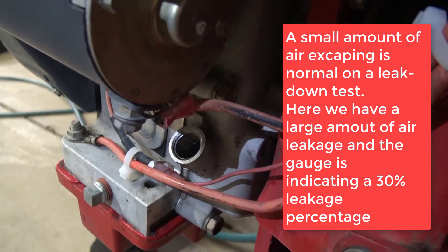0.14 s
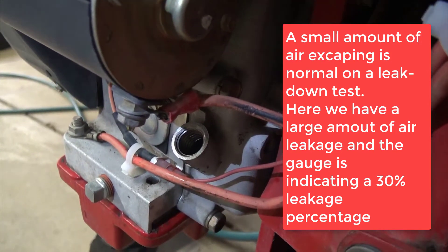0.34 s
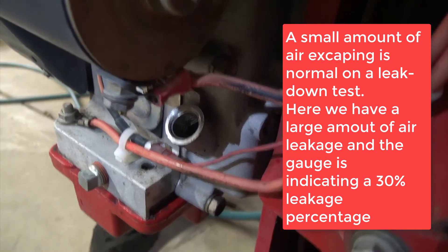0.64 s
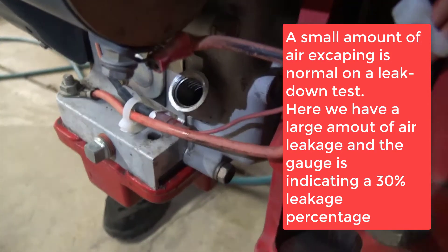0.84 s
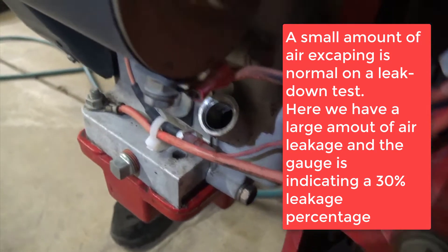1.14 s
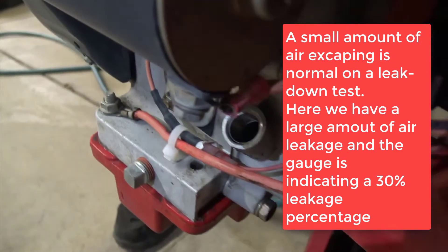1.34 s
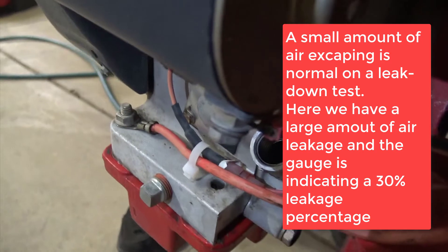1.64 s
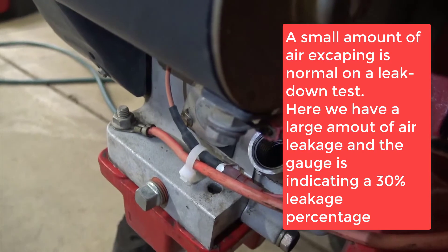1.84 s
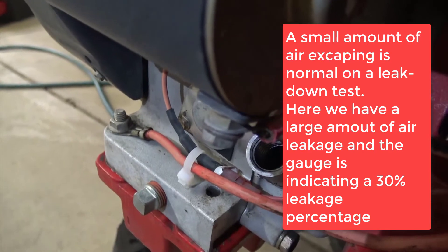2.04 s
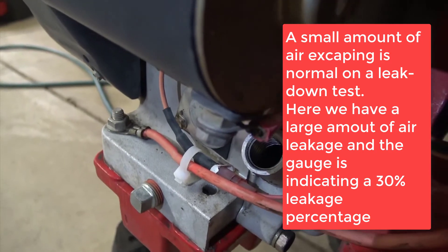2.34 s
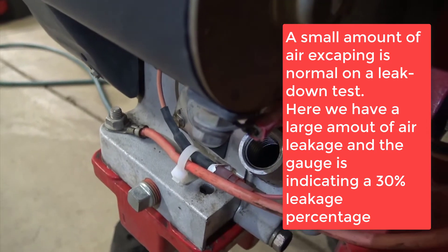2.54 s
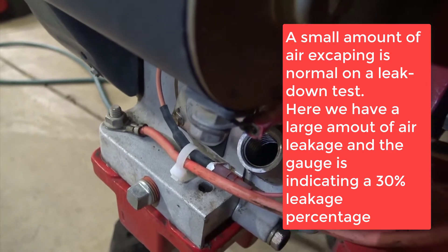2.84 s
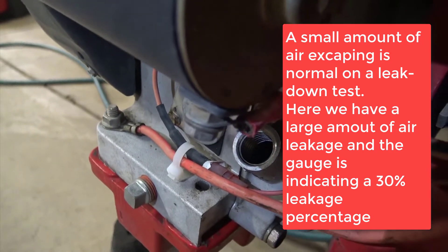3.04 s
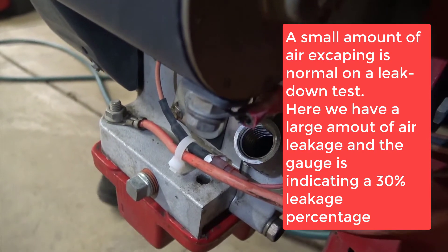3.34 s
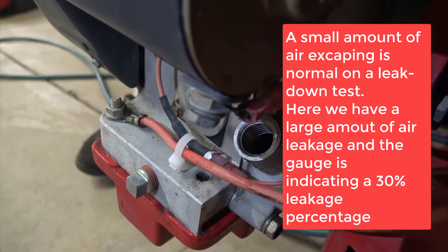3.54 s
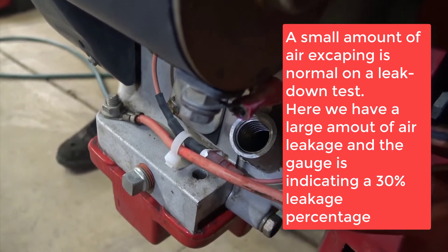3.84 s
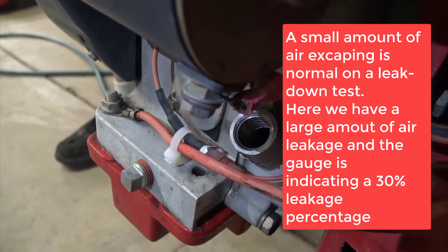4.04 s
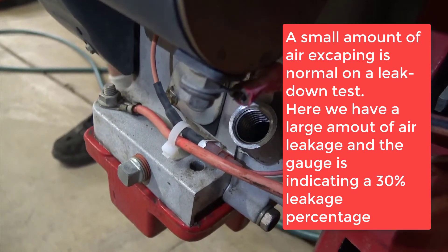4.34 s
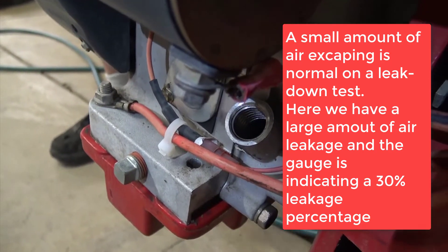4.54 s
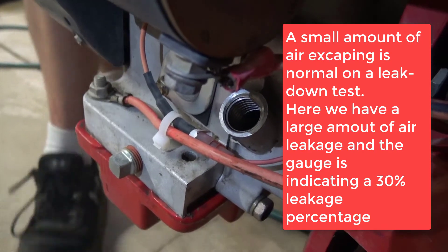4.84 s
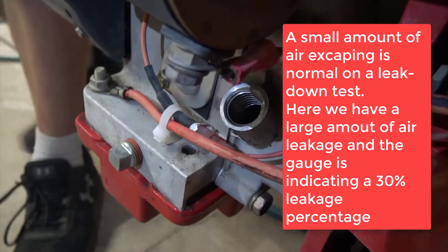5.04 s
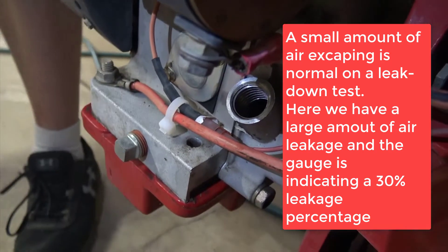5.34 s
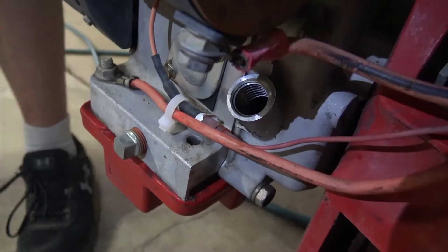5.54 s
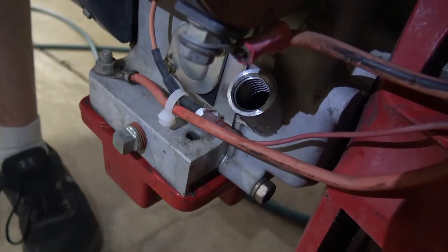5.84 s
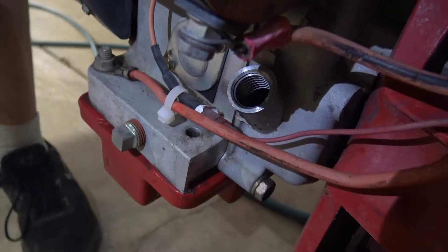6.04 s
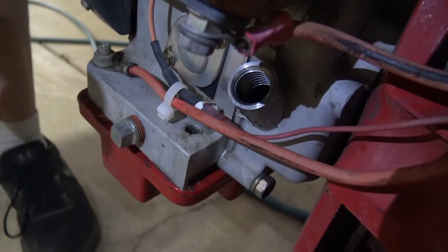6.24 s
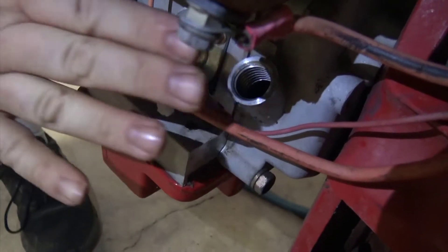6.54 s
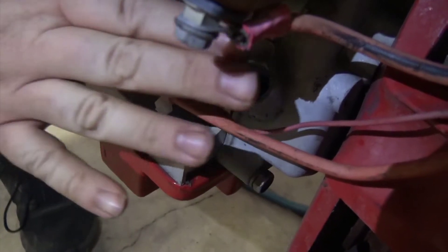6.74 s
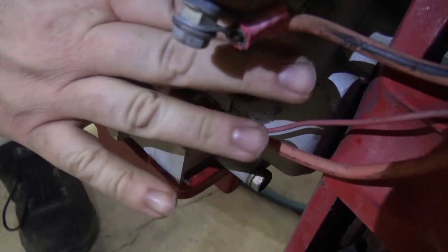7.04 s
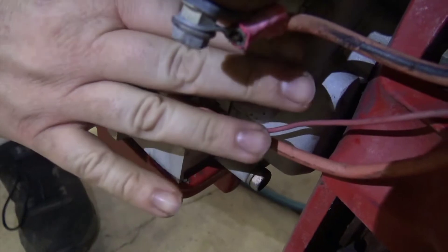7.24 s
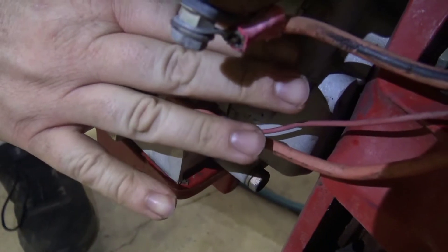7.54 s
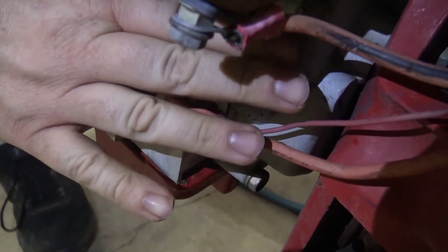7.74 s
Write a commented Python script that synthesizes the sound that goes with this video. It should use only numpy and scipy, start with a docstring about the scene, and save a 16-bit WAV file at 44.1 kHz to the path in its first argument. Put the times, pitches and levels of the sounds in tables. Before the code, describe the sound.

Steady, sharp compressed-air hiss, recorded close with a moving phone in a quiet garage. Rapid puffs and a spit come near one second, then the leak fades under hard, dry metallic knocks and a loose tool's rattle. More clunks come around three seconds. The hiss gradually rebuilds to its loudest, one gritty shoe scuff passes, and covering the opening narrows the hiss.

```python
"""A loose hose coupling spits air over the hiss of compressed air leaking through an engine crankcase in a garage.
Tools knock, rattle and scrape on the frame: short forces make its resonances ring. Dull thumps and brief hoots,
made from sine tones, join in. The phone swings round to face the open filler neck, a shoe scuffs, and a hand
covers the neck at the end. The hiss is noise shaped by drifting resonances; soft room noise lies underneath."""
import sys
import numpy as np
from scipy import signal
from scipy.fft import rfft, irfft
from scipy.io import wavfile
from scipy.ndimage import uniform_filter1d, map_coordinates

SR = 44100
rng = np.random.default_rng(int(sys.argv[2]) if len(sys.argv) > 2 else 0)


def wav_record(signal):
    """Record a signal, one row per channel, as 16-bit PCM in the file named by sys.argv[1]."""
    frames = np.transpose(np.atleast_2d(signal))
    bounded = np.clip(frames, -1, 1)
    # unit amplitude maps onto the largest positive 16-bit level
    quanta = np.round(bounded * 32767).astype(np.int16)
    wavfile.write(sys.argv[1], SR, quanta)


N = 347938


def undb(db):
    """Turn decibels into gain."""
    return 10 ** (np.asarray(db) / 20)


def over_time(t, table, column=1):
    """Read one column of a table at the times t, with straight lines between the rows."""
    columns = np.transpose(table)
    return np.interp(t, columns[0], columns[column])


def along(table, hz):
    """Read (f/Hz, level/dB) points on a log-frequency axis."""
    f, db = np.transpose(table)
    return np.interp(np.log(hz + 1), np.log(f), db)


def ring(modes, hz, steep):
    """Add up the power of a set of resonances; each is a peak that falls away on both sides."""
    return sum(undb(2 * db) / (1 + (2 * (hz - f) / width) ** 2) ** steep for f, width, db in modes)


def shaped(x, gain):
    """Filter a sound with one gain per frequency bin."""
    return irfft(rfft(x) * gain, len(x))


def patches(shape, bins, frames):
    """Make a random field that wanders smoothly over frequency and time, with spread 1."""
    field = rng.standard_normal(shape)
    for _ in range(2):
        field = uniform_filter1d(field, size=bins, axis=0)
        field = uniform_filter1d(field, size=frames, axis=1)
    return field / field.std()


def fading(t, t60, hold=0):
    """Hold at full level, then fall by 60 dB in every t60 seconds."""
    return 1000. ** (-np.maximum(t - hold, 0) / t60)


def add(out, s, sound):
    """Mix a sound in at time s."""
    i = int(s * SR)
    out[i:i + len(sound)] += sound[:N - i]


def struck(modes, force, lo_hz, hi_hz):
    """A force makes a set of modes ring; those between the two frequencies answer most."""
    hz = np.fft.rfftfreq(len(force), 1 / SR) + 1
    body = 0
    for k, (f, width, db) in enumerate(modes):
        sign = (-1) ** k
        body = body + sign * undb(db) / (1 + 1j * (hz / f - f / hz) * f / width)
    for ratio in (hz / hi_hz, -lo_hz / hz):  # soften the highs, then the lows
        body = body / (1 + 1.4j * ratio - ratio ** 2) ** 3
    return shaped(force, body / np.sqrt(np.mean(abs(body) ** 2)))


def side_share(pan_db):
    """Side over mid for a source that is this many dB louder on the left."""
    return (undb(pan_db) - 1) / (undb(pan_db) + 1)


# resonances of the hiss as heard from four places: (f/Hz, width/Hz, level/dB)
COUPLING = [(1120, 56, -9), (1578, 120, 7.5), (1900, 360, 3), (2256, 124, 3), (3340, 230, -10.5),
            (3965, 310, -0.5), (6310, 230, -1.5), (6940, 24, 0.5), (7520, 430, 0), (9200, 3000, -7.5),
            (10330, 320, -1.5), (11430, 590, -4.5), (12930, 99, -2), (15200, 320, -13.5)]
ASIDE = [(1177, 110, -20.5), (2175, 120, -14.5), (3256, 34, -4.5), (3682, 14, -2), (4143, 29, -6.5),
         (6240, 30, -9), (6700, 33, -1), (7160, 50, -14), (5340, 180, -12.5), (7500, 80, -14),
         (8760, 310, -4.5), (9210, 83, 8.5), (9544, 196, 4.5), (10500, 180, -19), (10300, 29, -10),
         (11340, 89, -2.5), (12200, 66, -15.5), (12630, 690, -4.5), (13600, 110, 0), (14550, 67, -0.5)]
FACING = [(1057, 72, -20), (1235, 31.4, -8.5), (1444, 63, -19), (2110, 22.3, -5.5), (2244, 94, -15.5),
          (3082, 24, -3.5), (3287, 49, -8), (3420, 70, -16.5), (4534, 23, 1.5), (4860, 30, -10),
          (5200, 54, -11.5), (5740, 49, -4), (5927, 71, 0), (6190, 180, -3.5), (6240, 62, -13.5),
          (6420, 49, 3), (7096, 130, -5), (6650, 62, -1.5), (7420, 88, -9), (7910, 120, -8),
          (8670, 240, -9.5), (9480, 210, -16), (9830, 280, 0), (10033, 245, 3.5), (10560, 85, -13.5),
          (11040, 280, -7), (12860, 240, -9.5), (13180, 370, -11), (14000, 150, -12.5)]
COVERED = [(1087, 41, -23), (1235, 48, -21.5), (2140, 32, -12), (2350, 360, -26), (3090, 22, -12),
           (3270, 13, -7.5), (3750, 80, -13.5), (4526, 28, 4.5), (4846, 77, -8), (4930, 60, -10),
           (5190, 70, -8.5), (6040, 120, -7.5), (6280, 69, -6.5), (6540, 130, 1), (7180, 128, -5),
           (7590, 250, -7.5), (8000, 260, -9), (9140, 270, -8.5), (9880, 270, -7), (9930, 110, -2.5),
           (12860, 310, -13), (14200, 240, -23)]
# which place is heard, 0-3 in the order above; fractions blend two: (t/s, place)
PLACE = [(0, 0), (.55, 0.3), (1.0, 0.5), (1.3, 1.5), (2.5, 1.36), (4.0, 1), (5.6, 2), (6.65, 2),
         (7.15, 2.5), (7.9, 3)]
# turbulence between the resonances, lowered by 12.5 dB below: (f/Hz, level/dB)
BED = [(290, -73.5), (500, -79), (1260, -23), (1470, -15), (1680, -88.5), (2170, -19), (2810, -25),
       (2980, -18), (3300, -9), (5220, -16.5), (6390, -2), (8650, -9.5), (11700, -1.5), (13100, -7),
       (15600, -9.5)]
# how far the resonances drift at each place: (share of their frequency, one per place)
WANDER = [0.017, .004, 0.00078, 0.0023]
# borders of the four bands cavity, neck, whistle and jet: (f/Hz)
EDGES_HZ = [0, 2700, 5450, 8400, 22050]
# how wide the hiss is: (f/Hz, side minus mid level/dB)
WIDE = [(500, -40), (2000, -88), (4000, -45), (5500, -21), (10200, -16.5), (10700, -18.5), (15500, -71)]
WINDOW, OVERLAP = 1024, 768  # samples in each short slice of sound, and shared by neighbours
TREBLE_HZ = 11000


def hiss():
    """Leaking air is turbulent noise that excites the cavity resonances; returns mid and side."""
    hz, t, mid = signal.stft(rng.standard_normal(N), SR, nperseg=WINDOW, noverlap=OVERLAP)
    side = signal.stft(rng.standard_normal(N), SR, nperseg=WINDOW, noverlap=OVERLAP)[2]
    bed = undb(2 * (along(BED, hz) - 12.5))
    colours = np.array([ring(modes, hz, 1.56) + bed for modes in (COUPLING, ASIDE, FACING, COVERED)])
    colours = colours / (1 + (500 / (hz + 1)) ** 4)  # a small opening radiates no bass

    # blend the places in dB, then let the resonances drift in frequency
    place = over_time(t, PLACE)
    share = np.clip(1 - abs(place - np.arange(len(colours))[:, None]), 0, 1)
    power = undb(2 * (10 * np.log10(colours.T) @ share))
    drift = 1 + (WANDER @ share) * patches(mid.shape, 90, 70)
    row, column = np.indices(mid.shape)
    power = map_coordinates(power, [row * drift, column], order=1, mode="nearest")

    # each resonance swells slowly and the flow flutters
    swelling_db = 1.8 * patches(mid.shape, 3, 35)
    flutter_db = 1.04 * patches(mid.shape, 90, 3)
    power = power * dips(hz, t) ** 2 * undb(2 * (swelling_db + flutter_db))

    # even out slow changes in each band, then give it its own level over time
    gain = np.zeros(mid.shape)
    for lo, hi, level in zip(EDGES_HZ, EDGES_HZ[1:], band_levels(t, share)):
        band = (hz >= lo) & (hz < hi)
        total = uniform_filter1d(power[band].sum(axis=0), size=40) / len(hz)
        gain[band] = np.sqrt(power[band] / total) * level
    gain[hz > TREBLE_HZ] *= treble(t)
    side_gain = gain * undb(along(WIDE, hz))[:, None]
    return [signal.istft(z, SR, nperseg=WINDOW, noverlap=OVERLAP)[1][:N]
            for z in (mid * gain, side * side_gain)]


# overall level of the leak as heard, sinking around some loud knocks and recovering;
# it is then shared out over the bands: (t/s, level/dB)
FLOW = [(0, -30), (.46, -33.5), (.6, -31.5), (1.05, -37.5), (1.3, -38.5), (1.55, -44), (1.72, -52),
        (1.8, -43), (1.96, -45.5), (2.1, -40.5), (2.26, -42.5), (2.45, -37), (2.97, -36.5), (3.07, -43),
        (3.9, -37.5), (4.5, -32.5), (5.1, -29.5), (5.48, -28.5), (5.7, -27.5), (6.7, -26.5), (7.2, -29.5),
        (7.89, -29.5)]
# how the leak is shared out, one row per place: (cavity level/dB, neck level/dB, whistle level/dB, jet level/dB)
BALANCES = [(-16, -24.5, -8, -0.5), (-21, -15, -3.5, -0.5), (-21, -14, -4, -2), (-16, -6.5, -0.5, -5.5)]
# the hiss dulls and brightens as the phone wanders; changes on top of the other levels:
# (t/s, cavity level/dB, neck level/dB, level/dB above TREBLE_HZ)
TINT = [(0, -3, -1, 0.5), (1.0, 7.5, 0, -0.5), (1.3, 1, -8.5, 0), (1.75, -2, -0.5, 0.5),
        (2.05, -3.5, 1, 3.5), (2.35, -7, 1, 0.5), (2.8, 5, 2, -1.5), (3.3, 1.5, 0.5, 4),
        (4.0, -2.5, 0, 1.5), (5.0, -1, -1, -3), (6.2, -1.5, -0.5, -1.5), (7.0, -1.5, 2, -3.5),
        (7.89, -0.5, 0.5, 4)]
# puffs from the loose coupling, and last a slow, faint, whistling swell of the hiss;
# the last three columns are relative to the jet level:
# (t/s of the top, jet level/dB, rise/s, fall/s, whistle level/dB, neck level/dB, cavity level/dB)
PUFFS = [(.65, -32, 0.027, 0.079, -10.5, -31, -9), (0.73, -29, 0.046, 0.064, -4.5, -15, -12.5),
         (.8, -32.5, 0.05, 0.1, -4.5, -6, -5), (0.945, -25, 0.041, 0.048, -20, -17, -11.5),
         (1.04, -33.5, 0.013, 0.011, -10, -31, -24), (1.125, -31, 0.025, 0.02, 1, -22, -10.5),
         (1.157, -31.5, .018, 0.0084, -4, -25, -13), (1.63, -37.5, 0.039, 0.027, -25.5, -11, -7.5),
         (2.8, -51, 0.23, .12, 8.5, -11, -19)]


def band_levels(t, share):
    """The overall level of the leak, shared out for the present place, plus puffs and a swell, sets each band."""
    tint = np.array([over_time(t, TINT, 1), over_time(t, TINT, 2), 0 * t, 0 * t])
    power = undb(2 * (over_time(t, FLOW) + np.transpose(BALANCES) @ share + tint))
    for s, db, rise, fall, whistle_db, neck_db, cavity_db in PUFFS:
        swell = np.exp(-((t - s) / np.where(t < s, rise, fall)) ** 2)
        bands_db = db + np.array([[cavity_db], [neck_db], [whistle_db], [0]])
        power = power + undb(2 * bands_db) * swell ** 2
    return np.sqrt(power)


def treble(t):
    """Gain of the highest part of the hiss as the phone wanders."""
    return undb(over_time(t, TINT, 3))


# narrow bands where the hiss is thinner, some fixed and some gliding:
# (start t/s, end t/s, start f/Hz, end f/Hz, depth/dB)
DIPS = [(-0.1, 1.1, 6000, 4800, 13), (-.3, 1.1, 13800, 13700, 10), (1.4, 3.1, 10550, 10600, 9),
        (1.9, 4.8, 8610, 7700, 16.5), (1.9, 2.4, 12900, 14000, 18), (1.7, 4.2, 11950, 11800, 7),
        (3.5, 7.8, 2730, 2840, 15), (3.5, 6.8, 2440, 2470, 9), (1.7, 8.4, 1660, 1500, 3.5),
        (2.5, 4.6, 10600, 10300, 23.5), (4.0, 4.73, 9660, 9800, 15), (4.5, 6.1, 4700, 4380, 3.5),
        (7.5, 8.4, 4540, 4550, 9.5), (4.5, 8.4, 9920, 9880, 18), (6, 7.25, 14900, 14000, 15),
        (7, 14, 15300, 15300, 22), (5.5, 6.7, 11530, 11160, 13.5), (5.5, 7.37, 5100, 5700, 6),
        (1.0, 2.2, 5300, 5350, 10.5), (3.0, 4.9, 5250, 5250, 13), (7, 9.2, 11750, 12200, 19.5),
        (7.101, 8.4, 10960, 11300, 15), (6, 8.2, 8730, 9050, 11)]
DIP_WIDTH_HZ, DIP_FADE_S = 410, 0.78  # greatest width; length of each fade


def dips(hz, t):
    """Narrow bands where the hiss is thinner, some fixed and some gliding; each fades in and out."""
    gain = 1
    for start, end, from_hz, to_hz, depth_db in DIPS:
        centre = np.interp(t, [start, end], [from_hz, to_hz])
        width = min(DIP_WIDTH_HZ, 0.042 * to_hz)
        near = 1 / (1 + (2 * (hz[:, None] - centre) / width) ** 2)
        fade = np.clip(.5 + np.minimum(t - start, end - t) / DIP_FADE_S, 0, 1)
        gain = gain * undb(-near * fade * depth_db)
    return gain


def fine_ripple(depth_db):
    """The crankcase also has many weak, close modes: a fixed fine ripple over frequency."""
    field = rng.standard_normal(N // 2 + 1)
    for _ in range(2):
        field = uniform_filter1d(field, size=150)
    return undb(depth_db * field / field.std())


# one sharp spit of air: (t/s, level/dB, length/s)
SPITS = [(1.194, -23.5, 0.002)]


def spit():
    """A short burst of bright jet noise, coloured by the coupling, starts fast and dies away."""
    out, t = np.zeros(N), np.arange(SR // 20) / SR
    hz = np.fft.rfftfreq(len(t), 1 / SR)
    colour = np.sqrt(ring(COUPLING, hz, 1.1))
    colour = colour / (1 + (6500 / (hz + 1)) ** 3) / (1 + (hz / 11500) ** 12)  # keep the bright middle
    for s, db, length in SPITS:
        jet = shaped(rng.standard_normal(len(t)), colour)
        envelope = np.minimum(t / 0.00074, 1) * fading(t, 0.021, length)
        add(out, s, undb(db) * jet / jet.std() * envelope)
    return out


# what the frame rings with: (f/Hz, width/Hz, level/dB)
FRAME = [(156, 117, 3), (256, 29, 5.5), (346, 59, 0.5), (514, 37, 0.5), (636.5, 31, 2), (808, 51, -1),
         (946, 45, 1.5), (1072, 45, 4.5), (1144, 45, 4.5), (1307, 69, 5), (1580, 175, 0), (1806, 36, 5),
         (2100, 250, -1.5), (3100, 340, 0), (4130, 225, 7), (4300, 300, -6.5), (5100, 460, -7.5)]
# knocks; the tail level is relative to the peak of the blow: (t/s, peak level/dB, lowest f/Hz, highest f/Hz,
# t60/s of the chatter, contact/s, tail level/dB, left minus right level/dB)
KNOCKS = [(0.914, -24.5, 804, 2730, 0.047, 0.016, -26, -6),
          (1.112, -33.5, 730, 1490, 0.036, 0.0053, -16, 0),
          (1.123, -31.5, 200, 4400, 0.023, 0.002, -30, -4), (1.248, -44.5, 700, 1400, .045, 0.0056, -25, 0),
          (1.358, -36, 543, 1870, 0.059, 0.0057, -6, -3),
          (1.4195, -18.5, 165, 1660, 0.094, 0.002, -19.5, -4),
          (1.5419, -16.5, 189, 1620, 0.053, 0.002, -25, -2),
          (1.944, -37.5, 448, 1310, 0.071, 0.0068, -23, 2), (1.995, -47, 900, 1460, .05, .006, -22, 4),
          (2.255, -34, 950, 1450, 0.082, 0.0044, -12.5, -9), (2.271, -34, 480, 1420, 0.097, 0.01, -35, -1),
          (2.298, -29, 600, 1340, 0.081, 0.0025, -36, -3), (2.454, -35.5, 830, 1090, 0.095, 0.01, -14, -3),
          (2.508, -51, 650, 1200, 0.04, 0.0035, -20, -1),
          (2.688, -23.5, 283, 2330, 0.049, 0.0074, -12.5, 1),
          (2.69, -23.5, 2870, 4470, 0.062, 0.0092, -18, -2), (3.037, -29, 3830, 4500, .04, 0.0053, -18, 0),
          (2.823, -35.5, 230, 1390, 0.12, 0.0086, -18, -6),
          (2.938, -15.5, 272, 1800, 0.045, 0.0065, -18.5, 0), (2.9452, -14, 230, 1500, 0.05, 0.002, -25, 0),
          (3.036, -15, 387, 2000, 0.075, 0.006, -13, 0), (3.049, -18.5, 395, 1930, 0.16, 0.004, -16.5, -4),
          (4.239, -29, 252, 1810, 0.11, 0.012, -31, 2), (4.823, -48, 99, 490, 0.032, 0.0033, -20, 3),
          (6.484, -54, 156, 400, 0.042, 0.0024, -19, 1)]
CLICKS_PER_S, CHATTER_DB = 450, 3.5  # average rate of re-contacts; unevenness of the chatter
STRIKE_SPREAD_DB = 2.5  # each blow lands elsewhere, so the modes answer unevenly


def knocks():
    """A sharp blow and a short uneven chatter ring the frame, then a tail from the walls; mid and side."""
    out, t = np.zeros((2, N)), np.arange(2 ** 14) / SR
    for s, db, lo, hi, t60, contact, tail_db, pan_db in KNOCKS:
        chatter, walls, bounce = rng.standard_normal((3, len(t)))
        bounce = np.repeat(bounce[:len(t) // 128], 128)  # the strength jumps in short steps
        clicks = (rng.random(len(t)) < CLICKS_PER_S / SR) * np.sqrt(SR / CLICKS_PER_S)  # separate re-contacts
        force = chatter * (clicks + undb(-1.0)) * undb(CHATTER_DB * bounce) * fading(t, t60, contact)
        force[0] = undb(32.0)  # the first blow
        uneven = np.outer(rng.standard_normal(len(FRAME)), [0, 0, STRIKE_SPREAD_DB])
        hit = struck(np.array(FRAME) + uneven, force, lo, hi)
        tail = struck(FRAME, walls * np.minimum(t / 0.01, 1) * fading(t, 0.28), lo, hi)
        sound = undb(db) * (hit / abs(hit).max() + undb(tail_db) * tail)
        add(out[0], s, sound)
        add(out[1], s, uniform_filter1d(sound, size=48) * side_share(pan_db))  # mostly the lows lean
    return out


# a loose tool's modes: (f/Hz, width/Hz, level/dB)
TOOL = [(552, 41, 3.5), (1067, 26, 0.5), (1280, 68, -1), (1816, 47, 2.5), (2140, 68, -9), (3020, 165, -3),
        (3200, 170, -3.5), (4280, 45, -8.5), (4620, 97, -9.5)]
# its bounces, before the levels of burst and buzz: (t/s, level/dB)
BOUNCES = [(1.589, -27.5), (1.618, -25), (1.638, -26.5), (1.664, -27.5)]


def rattle():
    """A loose tool bounces: each time a click and a bright quick burst over a duller, longer buzz."""
    out, t = np.zeros(N), np.arange(2 ** 13) / SR
    for s, db in BOUNCES:
        burst, buzz = rng.standard_normal((2, len(t)))
        burst[0] = buzz[0] = undb(17.0)  # the click
        bright = struck(TOOL, burst * fading(t, 0.015, .004), 2600, 5200)
        dull = struck(TOOL, buzz * fading(t, 0.1, .016), 450, 2400)
        add(out, s, undb(db) * (undb(-9.5) * bright + undb(-7.0) * dull))
    return out


# scrapes on the frame: (t/s, length/s, level/dB, lowest f/Hz, highest f/Hz, roughness/dB, rise/s)
SCRAPES = [(0.58, 0.28, -57.5, 278, 1270, 0.5, 0.024), (1.446, 0.012, -38.5, 694, 2250, 4.5, 0.0024),
           (1.909, 0.066, -52, 850, 1450, 3, 0.018), (2.468, 0.24, -58.5, 593, 1430, 5, .006),
           (2.826, 0.23, -48.5, 189, 1300, 5.5, 0.0049), (3.06, 0.058, -55, 148, 600, 1, .006),
           (3.433, 0.096, -60.5, 920, 1600, -1, 0.049), (4.174, 0.093, -52, 297, 1440, 3, 0.05),
           (2.167, 0.14, -59.5, 900, 1910, 3, .03), (2.254, 0.019, -49, 2720, 4480, -0.5, .005)]
# a shoe sole on concrete: (f/Hz, width/Hz, level/dB)
SOLE = [(880, 300, -0.5), (1530, 520, -3), (2100, 380, -4), (3140, 360, -2), (4100, 380, 1.5),
        (4600, 300, 2.5), (5200, 540, -2)]
# its scuff: (t/s, length/s, level/dB, lowest f/Hz, highest f/Hz, roughness/dB, rise/s)
SCUFFS = [(5.545, .085, -33.5, 693, 5960, 2.4, 0.019)]


def scrapes(table, modes):
    """Stick-slip rubbing: uneven grains of noise for the length of the drag, dying in the room."""
    out, t = np.zeros(N), np.arange(2 ** 15) / SR
    for s, length, db, lo, hi, rough_db, rise in table:
        grains = uniform_filter1d(np.repeat(rng.standard_normal(len(t) // 256), 256), size=120)
        drag = np.minimum(t / rise, 1) * fading(t, 0.13, length)
        force = rng.standard_normal(len(t)) * drag * undb(rough_db * np.tanh(grains))
        add(out, s, undb(db) * struck(modes, force, lo, hi))
    return out


# dull thumps through the hand, level before push and fading: (t/s, level/dB, f/Hz, t60/s)
THUMPS = [(0.423, -50.5, 85, 0.21), (1.056, -52, 88, 0.28), (1.364, -48.5, 77.5, 0.44),
          (1.682, -42.5, 142, 0.066), (2.689, -61.5, 108, 0.25), (2.931, -47, 140, 0.16)]
THUMP_PAN_DB = 2  # louder on the left


def thumps():
    """Soft low bumps: a fading sine tone with a gentle push at the start."""
    out, t = np.zeros(N), np.arange(SR // 2) / SR
    for s, db, hz, t60 in THUMPS:
        push = 1 - np.exp(-t / 0.0032)
        add(out, s, undb(db) * push * fading(t, t60) * np.sin(2 * np.pi * hz * t))
    return out


# short hoots, level before the swell is smoothed: (t/s of the top, level/dB, f/Hz, rise/s, fall/s)
HOOTS = [(3.496, -37, 516, 0.027, 0.029), (4.29, -55.5, 540, .02, 0.029), (4.81, -56, 380, 0.021, 0.025)]


def hoots():
    """Near-pure tones with a faint octave swell and fade."""
    t, out = np.arange(N) / SR, 0
    for s, db, hz, rise, fall in HOOTS:
        swell = np.exp(-abs(t - s) / np.where(t < s, rise, fall))
        swell = uniform_filter1d(swell, size=600)  # round off the top
        turn = 2 * np.pi * hz * t
        out = out + undb(db) * swell * (np.sin(turn) + undb(-20.0) * np.sin(2 * turn))
    return out


# tone colour of the room, scaled as a whole to GARAGE_DB: (f/Hz, level/dB)
GARAGE = [(18, -53), (30, -12.5), (118, -1), (199, -5.5), (284, -9), (383, -7), (707, -14.5), (900, -3.5),
          (1170, -6), (1980, -120)]
GARAGE_DB = -74


def garage():
    """Low steady room tone: filtered noise, nearly alike left and right."""
    gain = undb(along(GARAGE, np.fft.rfftfreq(N, 1 / SR)))
    mid, side = (shaped(rng.standard_normal(N), gain) for _ in range(2))
    return undb(GARAGE_DB) / mid.std() * np.array([mid, undb(-21.5) * side])


# where the phone points: (t/s, left minus right level/dB of the mid sound)
LEAN = [(0, .2), (1.05, 0), (2, -1.4), (2.9, -.3), (3.5, -1), (7.89, -.45)]


def scene():
    """Everything sits near the middle; the noises and the nearest reflections of the hits give some width."""
    air, air_side = hiss()
    room, room_side = garage()
    ripple = fine_ripple(1.3)
    ripple = ripple / np.sqrt(np.mean(ripple ** 2))
    blows, blows_side = knocks()
    bumps = thumps()
    hits = blows + scrapes(SCRAPES, FRAME) + scrapes(SCUFFS, SOLE) + rattle() + bumps + hoots()

    # a very short burst of fading noise stands for the nearest reflections
    near_walls = rng.standard_normal(size=600) * fading(np.arange(600) / SR, 0.011)
    echo = signal.fftconvolve(hits, near_walls / np.sqrt(np.sum(near_walls ** 2)))[:N]

    mid = shaped(air, ripple) + room + hits + spit()
    side = air_side + room_side + undb(-25.5) * echo + blows_side + side_share(THUMP_PAN_DB) * bumps
    lean_db = over_time(np.arange(N) / SR, LEAN) / 2  # half up on the left, half down on the right
    return np.array([mid * undb(lean_db) + side, mid * undb(-lean_db) - side])


TOP_HZ = 15680


def record(dry):
    """The phone cuts the top with a steep low-pass filter."""
    return signal.sosfilt(signal.ellip(16, .3, 85, TOP_HZ, fs=SR, output="sos"), dry)


dry = scene()
out = record(dry)
wav_record(out)
```